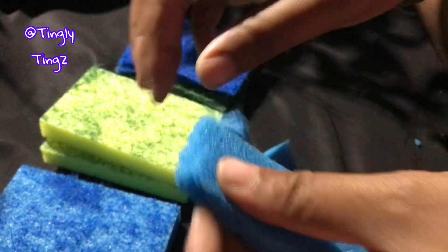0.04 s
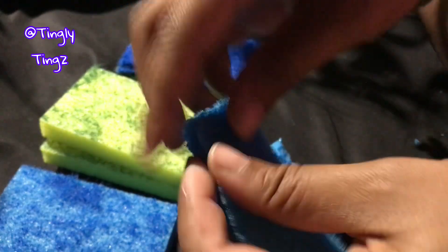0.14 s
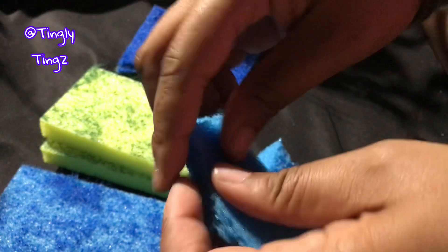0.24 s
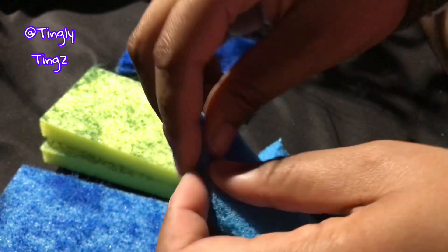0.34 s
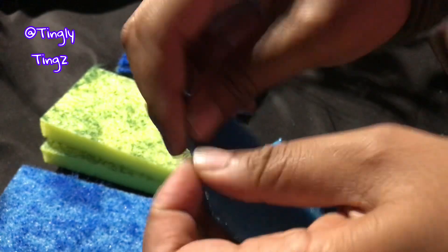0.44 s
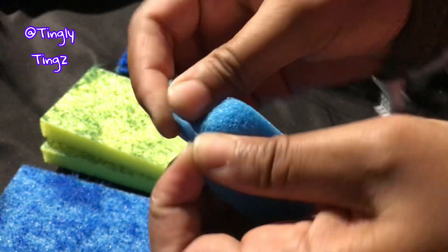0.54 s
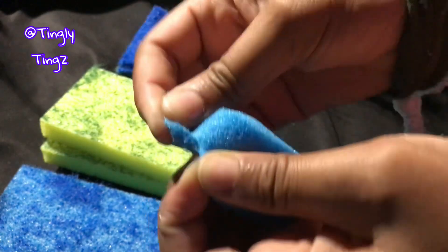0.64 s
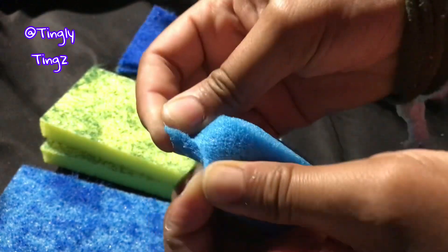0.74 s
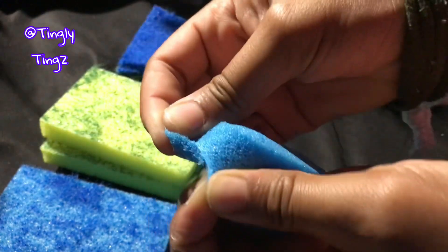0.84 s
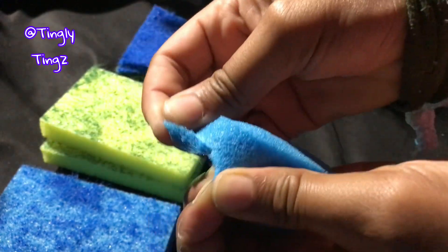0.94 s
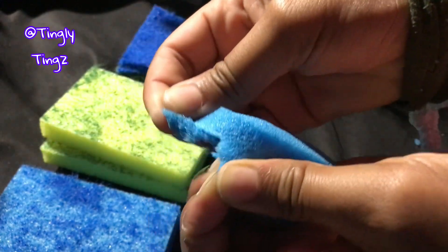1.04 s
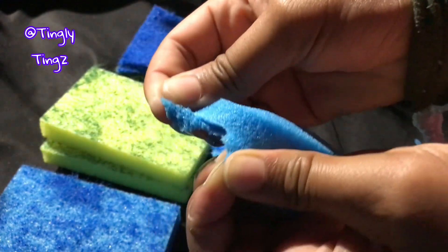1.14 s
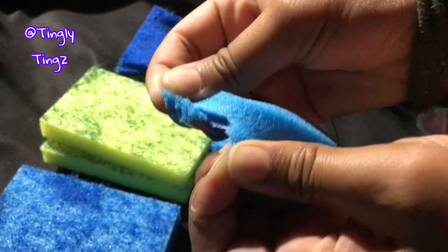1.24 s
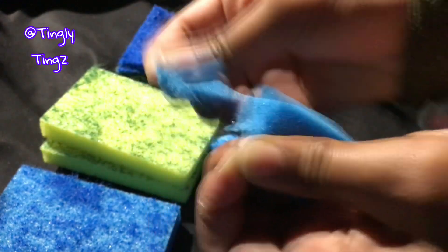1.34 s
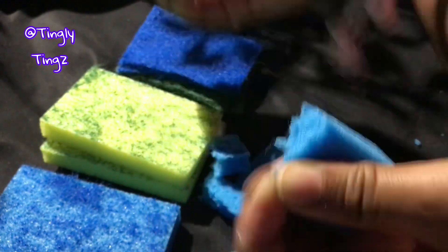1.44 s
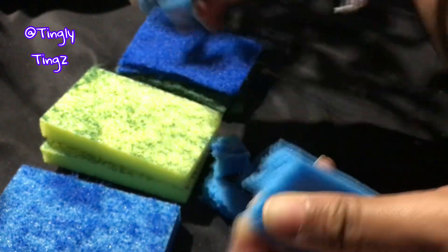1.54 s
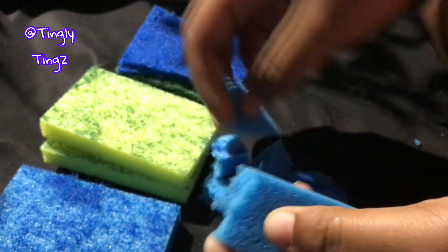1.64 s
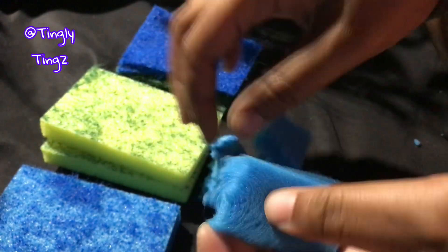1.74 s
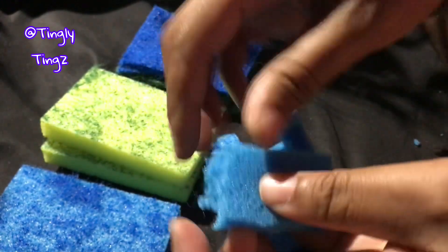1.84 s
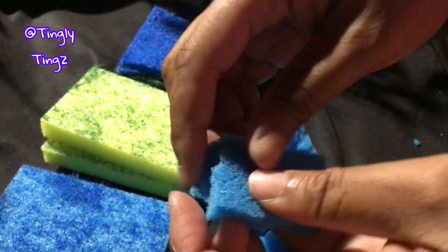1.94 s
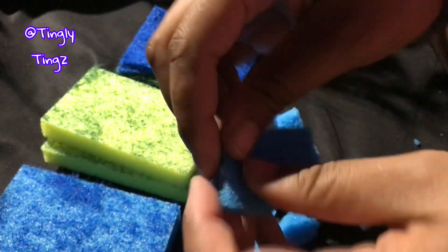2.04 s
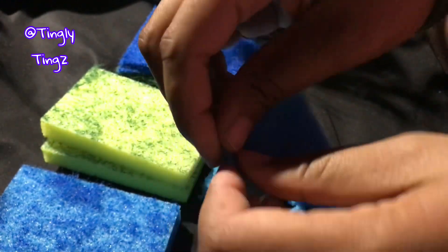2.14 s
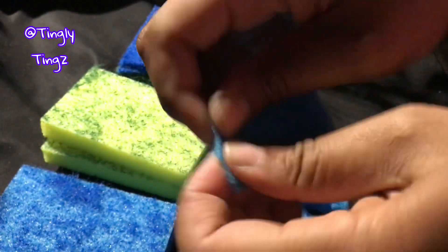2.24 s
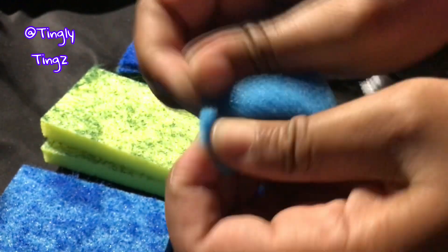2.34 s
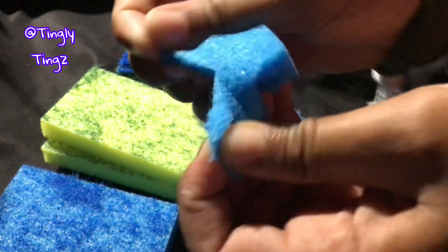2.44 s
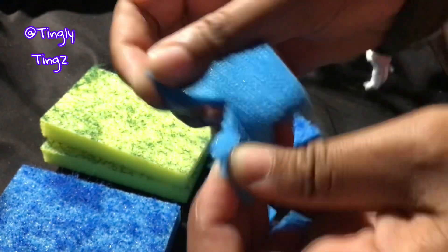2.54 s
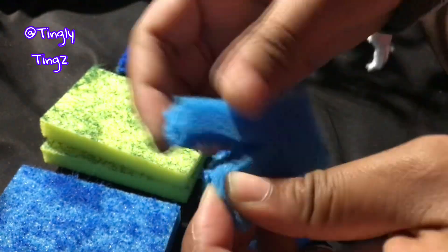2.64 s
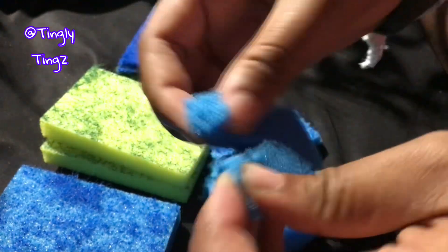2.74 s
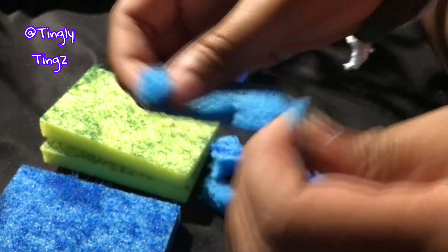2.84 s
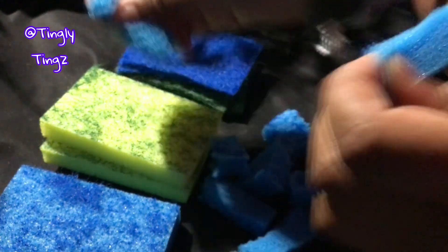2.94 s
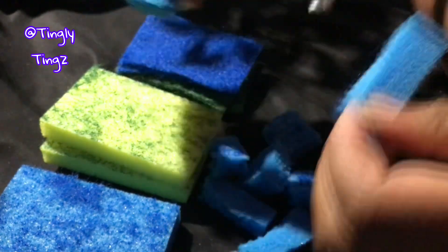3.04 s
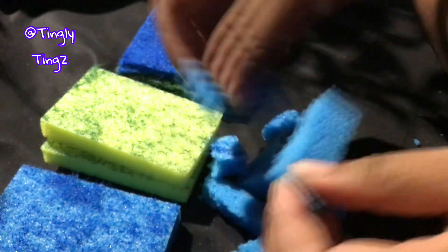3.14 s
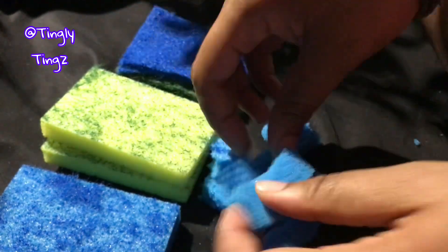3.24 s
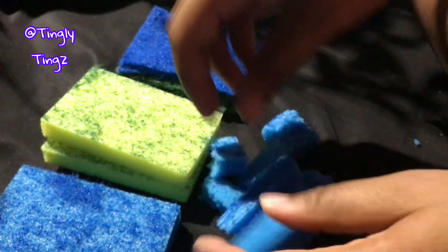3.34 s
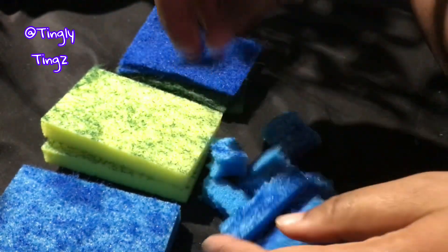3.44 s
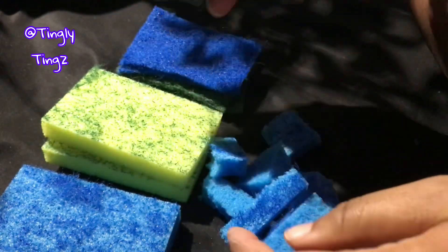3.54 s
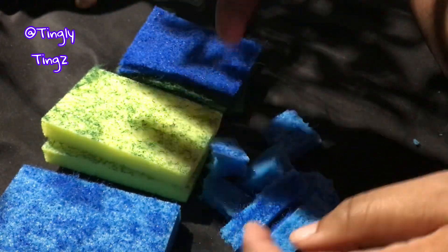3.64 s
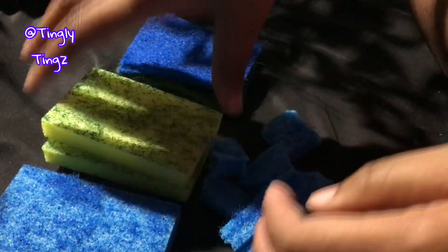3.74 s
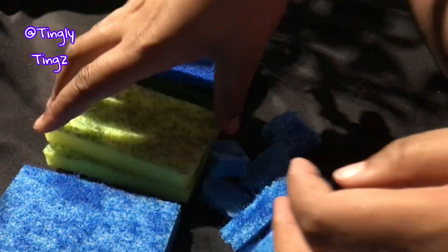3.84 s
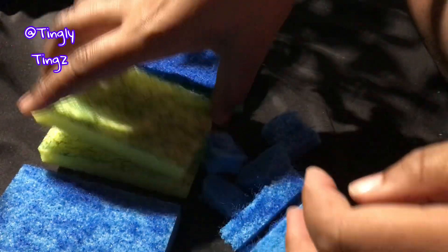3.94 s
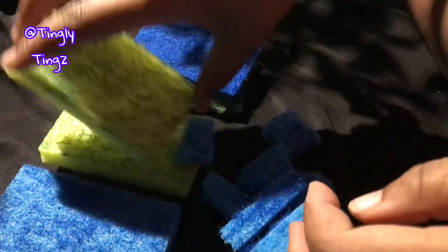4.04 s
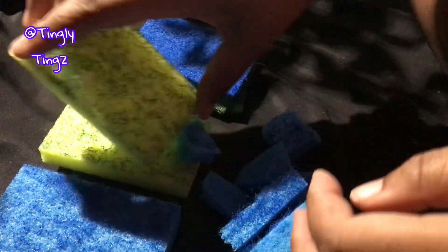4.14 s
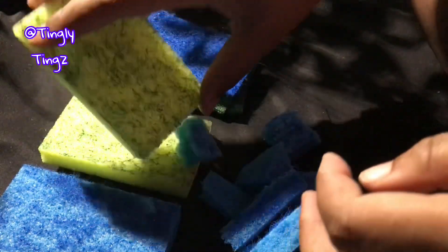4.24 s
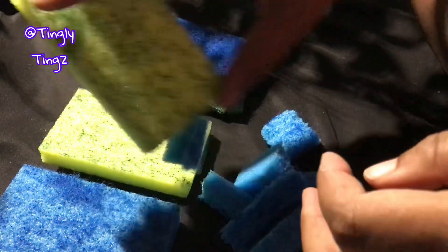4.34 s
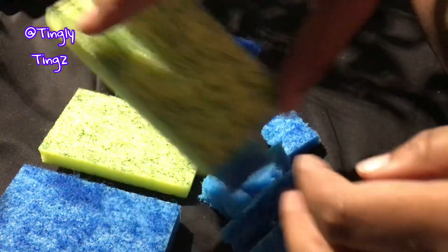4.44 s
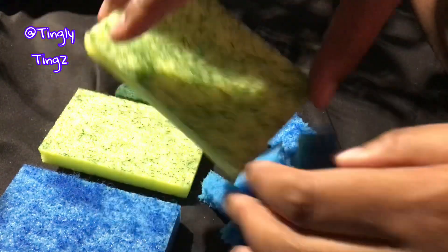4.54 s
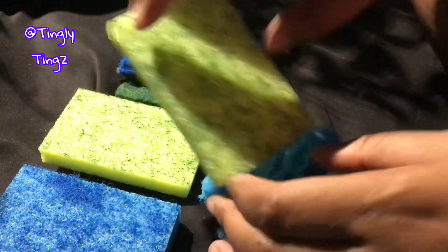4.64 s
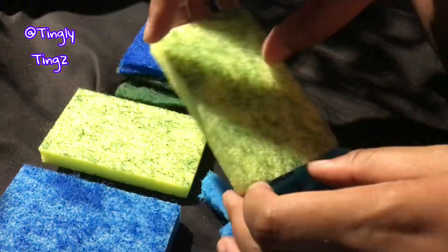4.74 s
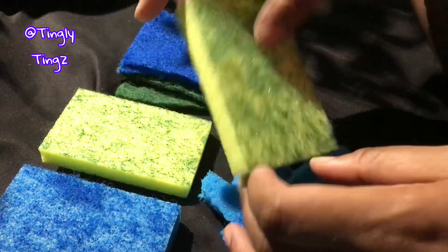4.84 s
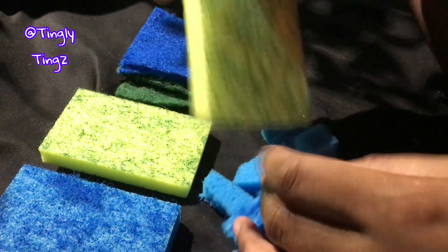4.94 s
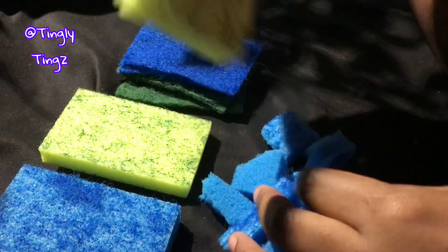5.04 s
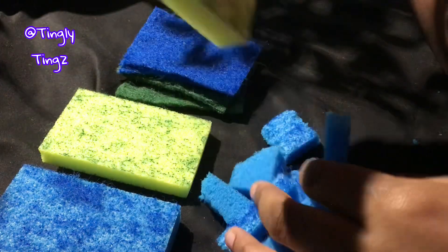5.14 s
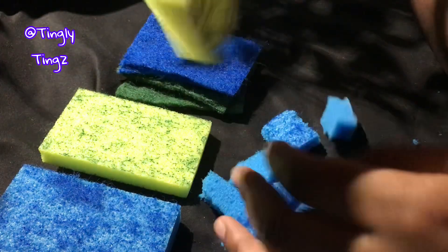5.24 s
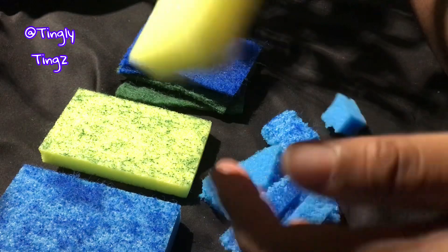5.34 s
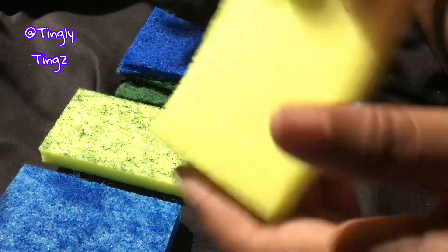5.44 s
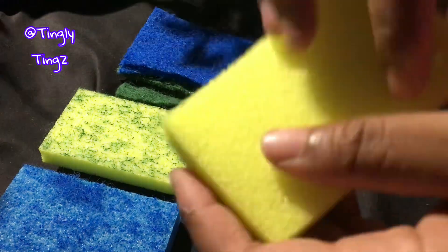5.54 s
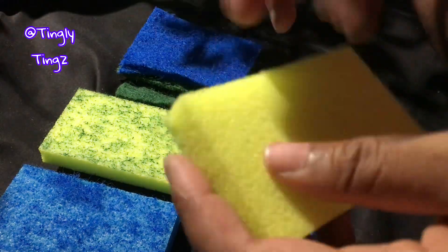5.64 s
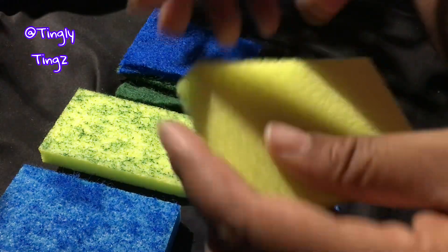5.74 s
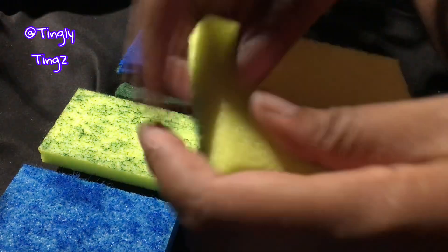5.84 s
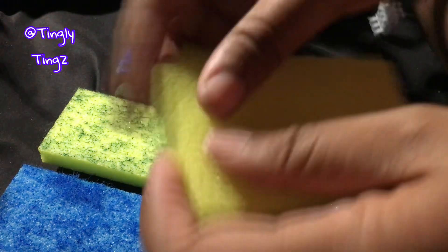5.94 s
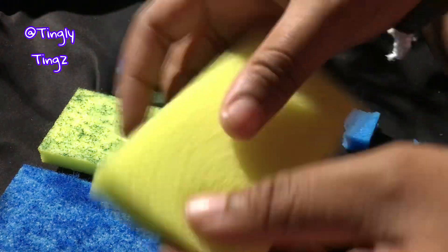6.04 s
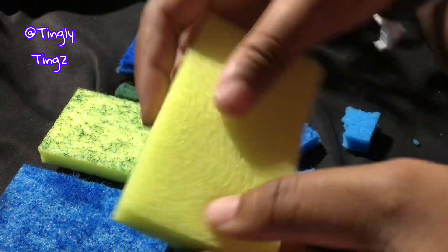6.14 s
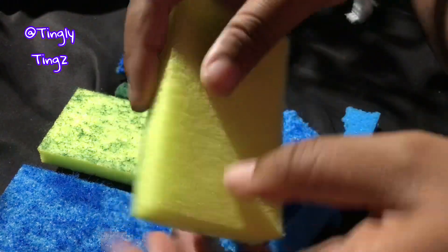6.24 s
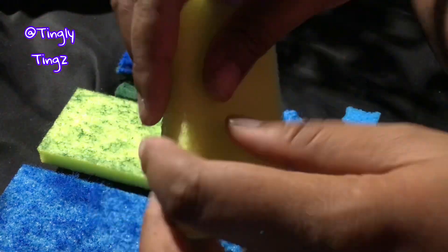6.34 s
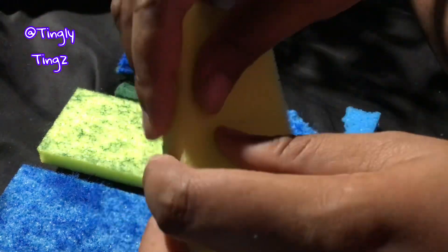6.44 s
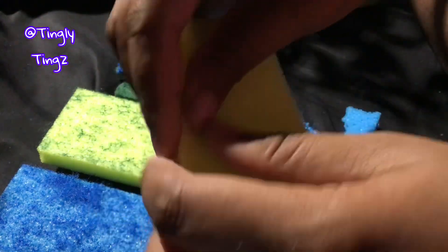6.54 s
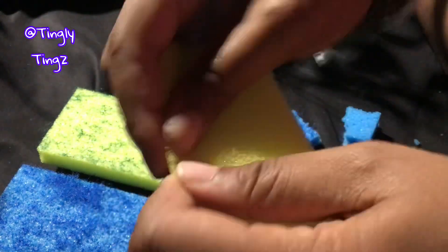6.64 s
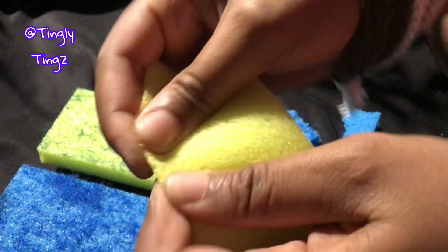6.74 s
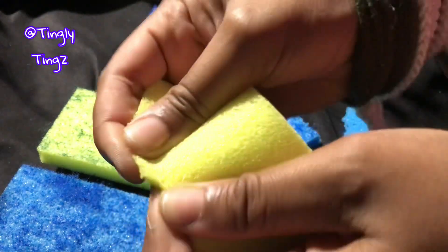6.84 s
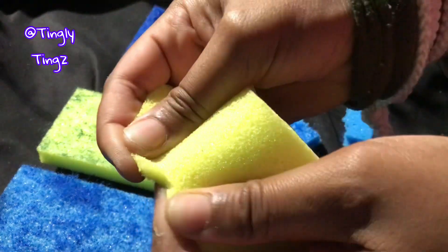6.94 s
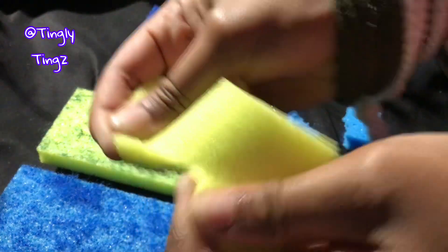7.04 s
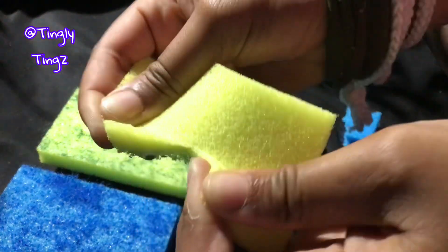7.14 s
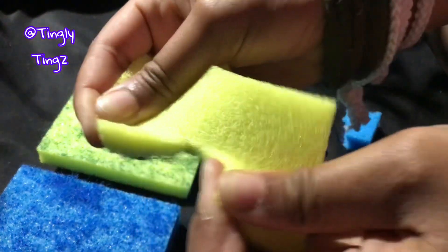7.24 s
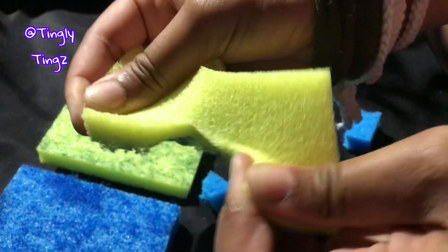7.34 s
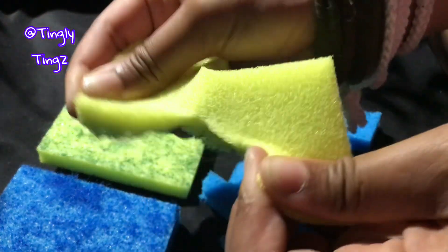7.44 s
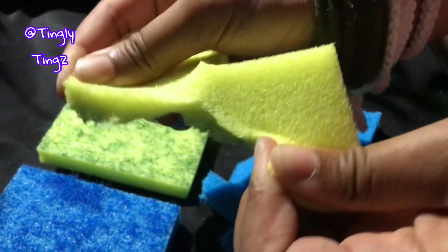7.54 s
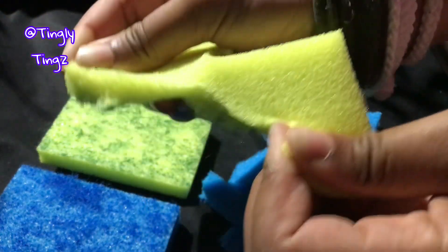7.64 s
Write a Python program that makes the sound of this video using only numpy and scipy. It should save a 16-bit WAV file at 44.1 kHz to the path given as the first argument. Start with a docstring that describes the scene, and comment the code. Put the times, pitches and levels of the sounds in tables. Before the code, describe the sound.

Hands work on kitchen sponges close by in a quiet room, over a faint motor drone, a thin appliance whine and soft hiss. From about 0.5 seconds, stretched foam fizzes and crackles, with sharp little snaps from 0.85. At 1.4 a piece rips off with a dry pop. After light rubbing, more snaps and a quick rip come at 2.4, then a third rip at 2.9 with a smaller pop and a very soft bump of a hand on cloth. From 3 to about 6.7 seconds there is only faint, scattered rustling and ticking of fingers on foam, a little busier after 5.5. From 6.8 a second, coarser sponge tears in several pulls, a denser, bright crackle with snapping strands, strongest between 7 and 7.5 and continuing to the end near 7.7. The low drone swells slightly under it.

```python
"""In a quiet room, hands pull two kitchen sponges apart close by: a blue one, then a coarser yellow one.
Stretched foam fizzes as its thin cell walls break, and its thicker strands (struts) crackle and snap.
Three times a piece rips right off; twice the freed foam springs back with a pop.
Between tears the fingers rub the sponges, and once a hand lands softly on the cloth.
Behind it all, motors drone and appliances hum and whine over the rumble and hiss of the room."""
import sys
import numpy as np
from scipy import signal
from scipy.fft import rfft, irfft
from scipy.io import wavfile
from scipy.ndimage import uniform_filter1d

SR = 44100
rng = np.random.default_rng(int(sys.argv[2]) if len(sys.argv) > 2 else 0)


def bounce(signal):
    """Save signal as a 16-bit WAV file at the path given by the first command-line argument."""
    frames = np.transpose(np.atleast_2d(signal))
    limited = np.clip(frames, -1, 1)
    pcm = np.round(limited * 32767).astype(np.int16)
    wavfile.write(sys.argv[1], SR, pcm)


N = 339129
TIME = np.arange(N) / SR

# Levels in the tables are relative: the functions may turn a whole layer up or down.
# tone colours of the room's rumble and hiss: (pitch [Hz], level [dB])
RUMBLE_SPECTRUM = [(20, -24.5), (50, -15.5), (85, -1), (115, -6), (150, -5.5), (178, 2), (230, -4.5),
                   (295, -14), (340, -9), (460, -20.5), (700, -16), (900, -16), (1100, -15.5), (1400, -26)]
HISS_SPECTRUM = [(1000, -5.5), (1400, 3.5), (2000, 2.5), (2500, 3.5), (2750, -6), (3200, -1), (3800, -8.5),
                 (4900, -13), (5500, -11.5), (7500, -17), (9300, -14.5), (10300, -25), (11500, -17),
                 (16000, -18)]
# moments when two motors are out of step and their drone sinks: (time [s])
MOTOR_LULL_TIMES = [0.3, 0.26, 2.3, 3, 4.5, 6.5, 8.5]
# a third motor that swells late: (time [s], level [dB])
LATE_MOTOR_LEVELS = [(0, -75), (5.9, -57), (6.25, -47), (6.55, -49), (7.3, -39), (7.69, -43.5)]
# steady hum of a fan and the mains: (pitch [Hz], level [dB])
HUM_TONES = [(58.7, -94), (93.9, -42.5), (120, -60.5), (187.7, -47), (240, -49.5), (258.2, -55),
             (281.6, -67), (360, -65), (518, -68.5), (775, -78), (1749, -69.5), (1987, -71.5),
             (2401.7, -68)]
# narrow bands where the appliances whine and whistle: (pitch [Hz], width [Hz], level [dB])
WHINE_BANDS = [(2236, 7.1, -14.5), (2236, 26, -12.5), (2297, 33, -6), (2325, 8.7, -16), (2318.5, 2.9, -3.5)]
WHISTLE_BANDS = [(3166, 166, -69), (5350, 81, -88), (9660, 440, -81.5), (12000, 190, -83)]
# swells of the whine and of the lowest whistle: (middle [s], half length [s], rise [dB])
WHINE_RISES = [(0.123, 0.13, 4.5), (0.855, 0.28, 8), (1.478, 0.22, 2), (2.117, 0.24, 7.5),
               (3.31, 0.07, 8.5), (5.85, 0.5, 3.5), (7.1, 0.87, 6)]
LOW_WHISTLE_RISES = [(6.1, 1.65, 9)]
# fingers stroke the foam: (middle [s], half length [s], level [dB])
FINGER_STROKES = [(0.15, 0.045, -60), (0.28, 0.067, -64), (1.468, 0.11, -63), (1.616, 0.027, -60),
                  (2.013, 0.018, -56), (2.29, 0.033, -57.5), (2.492, 0.081, -61), (2.667, 0.038, -59),
                  (3.3, 0.02, -65), (3.618, 0.028, -52.5), (3.923, 0.066, -65), (4.855, 0.078, -64.5),
                  (5.06, 0.077, -64), (5.48, 0.02, -63), (5.612, 0.12, -60.5), (5.785, 0.12, -60.5),
                  (5.97, 0.026, -48.5), (6.052, 0.072, -54), (6.162, 0.023, -53), (6.376, 0.064, -65),
                  (6.519, 0.022, -50), (6.706, 0.22, -63.5)]
# fingertips catch on the foam: (time [s], level [dB])
FINGER_CATCHES = [(2.664, -35), (3.0615, -39.5), (4.5844, -43), (5.473, -34), (5.6214, -41), (6.158, -31),
                  (6.3505, -38), (6.757, -30.5), (6.7915, -41), (6.8907, -22)]
# tone colour of rubbed foam: (pitch [Hz], level [dB])
RUB_SPECTRUM = [(800, 0), (3000, 5), (4500, 1.5), (6000, 0), (7700, -0.5), (9300, 0.5), (10300, -1),
                (11300, 2.5), (13500, 3), (16000, 4.5)]
# pulls that slowly tear each sponge: (start [s], end [s], wall level [dB], strut level [dB])
BLUE_PULLS = [(0.492, 1.22, -53, -65.5), (0.56, 0.6, -47, -54), (0.882, 0.91, -43.5, -57),
              (0.966, 1, -42, -52), (1.02, 1.16, -46.5, -69), (1.055, 1.074, -43.5, -51),
              (1.208, 1.32, -42, -59)]
YELLOW_PULLS = [(6.765, 7.125, -49, -63.5), (6.975, 7.02, -40, -58), (7.02, 7.118, -39, -44),
                (7.185, 7.24, -45, -53), (7.232, 7.36, -36, -40.5), (7.398, 7.485, -36.5, -44),
                (7.49, 7.6, -41.5, -52.5), (7.61, 7.69, -39.5, -51)]
# tone colours of breaking cell walls and struts in each sponge: (pitch [Hz], level [dB])
BLUE_WALL_SPECTRUM = [(1500, -21), (4900, -13.5), (5600, -6), (6700, -4), (7700, -7.5), (9400, -1),
                      (10400, -7.5), (11100, -1), (12500, 0), (14000, 3.5), (16000, 1)]
BLUE_STRUT_SPECTRUM = [(150, -5), (350, -7), (600, 9.5), (1200, 2.5), (2000, 2), (3200, -0.5), (4200, -0.5),
                       (5000, -5), (6700, -3.5), (8000, -19), (16000, -14)]
YELLOW_WALL_SPECTRUM = [(1500, -28), (5000, -20), (6500, -12), (7500, -7.5), (9300, -5.5), (10200, -6.5),
                        (11400, -0.5), (13400, -0.5), (14200, 2.5), (16000, -0.5)]
YELLOW_STRUT_SPECTRUM = [(150, -11), (550, -3), (1000, -0.5), (1600, -1.5), (2600, -8), (3400, 0.5),
                         (3700, -4.5), (4300, 2.5), (5000, -4.5), (5550, -1), (6100, -3.5), (8000, -6.5),
                         (16000, -9)]
# single strands snap: (time [s], bright level [dB], strut level [dB])
STRAND_SNAPS = [(0.4975, -40, -48), (0.853, -26, -54), (0.8607, -16.5, -32), (0.8856, -17.5, -33.5),
                (0.971, -26, -37), (1.065, -21, -46), (1.1448, -20, -48), (1.2303, -21, -38),
                (1.2535, -18, -38), (1.3378, -19, -44), (2.3096, -28, -55), (2.325, -31, -47),
                (2.346, -26, -50), (2.3615, -20, -47), (2.385, -26, -34), (2.4025, -19, -40),
                (2.4224, -18, -34), (2.8437, -18, -36), (2.8549, -13, -29.5), (2.8803, -19, -30),
                (6.971, -23.5, -40), (7.0758, -18, -47), (7.1066, -27, -39), (7.1216, -19, -43),
                (7.2434, -20, -25), (7.3015, -17, -32), (7.439, -23, -35)]
# fast rips, two rows for each piece:
# (start [s], end [s], swell [s], fade [s], wall level [dB], strut level [dB], pitch of the strip [Hz])
FAST_RIPS = [(1.344, 1.356, 0.0006, 0.0033, -27.5, -36, 2780),
             (1.365, 1.376, 0.004, 0.0011, -36, -31, 7050), (2.377, 2.401, 0.0058, 0.012, -36, -33.5, 3430),
             (2.414, 2.442, 0.026, 0.0096, -32, -38.5, 5900),
             (2.853, 2.869, 0.0013, 0.0063, -36, -41.5, 6400),
             (2.891, 2.917, 0.018, 0.0025, -28.5, -36, 6500)]
# tone colour of the blue foam's struts in a fast rip: (pitch [Hz], level [dB])
RIP_STRUT_SPECTRUM = [(150, -23), (400, -9.5), (600, 4.5), (1000, -3), (1400, 1.5), (1850, 2.5), (2500, -1),
                      (3300, 0.5), (4200, -0.5), (5200, -6.5), (6700, -1.5), (8000, -6), (16000, -6)]
# freed foam springs back: (time [s], level [dB])
FOAM_RECOILS = [(1.3749, -15), (2.9152, -25)]


def from_db(db):
    """Turn decibels into a number to multiply a sound by."""
    return 10 ** (np.asarray(db) / 20)


def rms_one(x):
    """Scale a signal so its average strength (rms) is 1."""
    return x / np.sqrt(np.mean(x ** 2) + 1e-20)


def colour(x, spectrum, size=16384):
    """Give a sound a tone colour; white noise keeps its power."""
    hz, db = np.transpose(spectrum)
    log_hz = np.log(np.arange(size // 2 + 1) * SR / size + 1)
    gain = rms_one(from_db(np.interp(log_hz, np.log(hz), db)))
    cepstrum = irfft(np.log(gain), size)
    cepstrum[1:size // 2] *= 2      # this line and the next put all ringing after its cause
    cepstrum[size // 2 + 1:] = 0
    ringing = irfft(np.exp(rfft(cepstrum)), size)[:size // 2]
    return signal.oaconvolve(x, ringing)[:N]


def drift(per_s):
    """A smooth random wander of size about 1, changing roughly per_s times a second."""
    steps = rng.standard_normal(int(TIME[-1] * 1000) + 2000)  # one each millisecond, plus a run-up
    memory = np.exp(-2 * np.pi * per_s / 1000)
    slow = signal.lfilter([1], [1, -2 * memory, memory * memory], steps)[1990:]
    return np.interp(TIME * 1000, np.arange(len(slow)), rms_one(slow))


def tone(hz):
    """A pure tone of average strength 1."""
    return np.sqrt(2) * np.sin(2 * np.pi * (hz * TIME + rng.random()))


def swell(middle_s, half_s):
    """A smooth rise and fall of height 1."""
    return np.exp(-np.minimum(((TIME - middle_s) / half_s) ** 2, 60))


def swelling(steady_db, rises):
    """The strength of a steady sound that grows louder now and then."""
    return from_db(steady_db + sum(db * swell(middle, half) for middle, half, db in rises))


def clicks(rows, column=1):
    """One spike for each row, as high as the level in the chosen column."""
    rows, spikes = np.array(rows), np.zeros(N)
    spikes[np.round(rows[:, 0] * SR).astype(int)] = from_db(rows[:, column])
    return spikes


def bursts(spikes, decay_s):
    """Each spike sets off a tiny rush of breaks: a puff of noise that dies away."""
    fading = signal.lfilter([1], [1, -np.exp(-1 / (decay_s * SR))], spikes + 1e-18)
    return fading * rng.standard_normal(N)


def crackle(per_s, spread_db, decay_s, clump_db):
    """Random breaks of uneven size come in clumps; their average strength is held near 1."""
    breaks = rng.random(N) < per_s / SR
    sizes = from_db(spread_db * np.minimum(rng.exponential(1, N), 4) + clump_db * drift(71))
    x = bursts(breaks * sizes, decay_s)
    return x / np.sqrt(uniform_filter1d(x ** 2, size=900) + 1e-4)


def air(rumble_db, hiss_db):
    """The room rumbles and hisses steadily."""
    low, high = rng.standard_normal((2, N))
    low = signal.sosfilt(signal.butter(4, 1500, fs=SR, output="sos"), low)
    rumble = from_db(rumble_db) * colour(low, RUMBLE_SPECTRUM)
    return rumble + from_db(hiss_db) * colour(high, HISS_SPECTRUM)


def motors(pair_hz, late_hz, pair_db, beat_depth):
    """Two motors at almost the same speed slip in and out of step (they beat); a third swells late."""
    slip = 2 * np.pi * np.interp(TIME, MOTOR_LULL_TIMES, np.arange(len(MOTOR_LULL_TIMES)))
    together = np.abs(1 - beat_depth * np.exp(1j * slip))
    late_gain = from_db(np.interp(TIME, *np.transpose(LATE_MOTOR_LEVELS)))
    return from_db(pair_db) * together * tone(pair_hz) + late_gain * tone(late_hz)


def narrow_noise(bands):
    """Swirling air keeps a few sharp pitches ringing."""
    total = 0
    for hz, width_hz, db in bands:
        phase = 2 * np.pi * hz * TIME
        ring = drift(width_hz / 2) * np.cos(phase) + drift(width_hz / 2) * np.sin(phase)
        total += from_db(db) * ring
    return total


def appliances(whine_db, low_whistle_db, waver_db):
    """A fan and the mains hum, under faint whistles and a whine whose close pitches beat together."""
    hum = sum(from_db(db + waver_db * drift(3.5)) * tone(hz) for hz, db in HUM_TONES)
    whine = narrow_noise(WHINE_BANDS)
    whine /= np.sqrt(uniform_filter1d(whine ** 2, size=12000))  # even out slow changes in level
    whistles = narrow_noise(WHISTLE_BANDS)
    low_whistle = swelling(low_whistle_db, LOW_WHISTLE_RISES) * narrow_noise([(1091, 95, 0)])
    return hum + swelling(whine_db, WHINE_RISES) * whine + whistles + low_whistle


def fingers(rub_db, catch_db, uneven_db):
    """Skin slides over open cells in a fine, uneven rustle, and catches now and then."""
    grip_power = from_db(-77.5) ** 2  # a faint rustle stays between strokes
    stroke_power = sum((from_db(db) * swell(middle, half)) ** 2 for middle, half, db in FINGER_STROKES)
    strength = np.sqrt(grip_power + stroke_power) * from_db(uneven_db * drift(15))
    slide = strength * crackle(per_s=3500, spread_db=1.1, decay_s=0.0017, clump_db=1.7)
    catches = bursts(clicks(FINGER_CATCHES), decay_s=0.0011)
    return colour(from_db(rub_db) * slide + from_db(catch_db) * catches, RUB_SPECTRUM)


def between_hands(x, echo_db, sway):
    """Echoes off the moving palms and the table keep shifting the tone colour."""
    total, samples = x, np.arange(N)
    for delay_s in (0.0004, 0.0009, 0.0014):
        lag = SR * delay_s * np.exp(sway * drift(0.8))
        total = total + from_db(echo_db) * np.interp(samples - lag, samples, x)
    return total


def room_echo(x, echo_db, fade_s):
    """The furnished room adds a short, faint tail that falls 60 dB in fade_s."""
    t = TIME[:SR // 3]
    tail = rng.standard_normal(len(t)) * from_db(-60 * t / fade_s) * (t > 0.003)
    return x + from_db(echo_db) * signal.oaconvolve(x, tail / np.linalg.norm(tail))[:N]


def pull(start, end, attack_s=0.013, sag_db_per_s=9, release_s=0.027):
    """A pull takes hold quickly, eases as the foam gives, and dies away when the hands stop."""
    since = np.maximum(TIME - start, 0)
    release = np.exp(-np.clip((TIME - end) / release_s, 0, 40))
    return np.minimum(since / attack_s, 1) * from_db(-sag_db_per_s * since) * release


def slow_tear(pulls, wall_spectrum, strut_spectrum, wall_db, strut_db, per_s, spread_db, clump_db=0.5):
    """The tear creeps cell by cell: thin walls fizz brightly, the fewer, thicker struts sound lower."""
    shapes = np.array([pull(start, end) for start, end, _, _ in pulls])
    gains = from_db(np.array(pulls)[:, 2:].T)
    wall_gain, strut_gain = np.sqrt(gains ** 2 @ shapes ** 2)  # overlapping pulls add their power
    walls = from_db(wall_db) * wall_gain * crackle(per_s, spread_db, 0.00096, clump_db)
    struts = from_db(strut_db) * strut_gain * crackle(per_s * 0.5, spread_db, 0.00077, clump_db)
    return colour(walls, wall_spectrum) + colour(struts, strut_spectrum)


def snaps(bright_db):
    """Single strands crack, the thick ones with more body."""
    bright = colour(bursts(clicks(STRAND_SNAPS), decay_s=0.0013), BLUE_WALL_SPECTRUM)
    body = colour(bursts(clicks(STRAND_SNAPS, column=2), decay_s=0.0019), BLUE_STRUT_SPECTRUM)
    return from_db(bright_db) * bright + body


def rips(per_s, spread_db, clump_db, ring_db, ring_sharpness):
    """The last bit of foam gives way: a rush of breaks rings in the tight strip until it is free."""
    fine = crackle(per_s, spread_db, 0.00023, clump_db)
    coarse = crackle(per_s * 0.4, spread_db, 0.00049, clump_db)
    walls, struts = 0, 0
    for start, end, swell_s, fade_s, wall_db, strut_db, strip_hz in FAST_RIPS:
        rise, fall = (TIME - start) / swell_s, (end - TIME) / fade_s
        speed = np.exp(np.clip(np.minimum(rise, fall), -40, 0))  # full from start to end
        ring = signal.lfilter(*signal.iirpeak(strip_hz, ring_sharpness, fs=SR), coarse)
        walls += from_db(wall_db) * speed * fine
        struts += from_db(strut_db) * speed * (coarse + from_db(ring_db) * ring)
    return colour(walls, BLUE_WALL_SPECTRUM) + colour(struts, RIP_STRUT_SPECTRUM)


def recoils(tight_hz, slack_hz, relax_s, decay_s, crack_db):
    """Freed foam springs back: a dry crack and a pop whose pitch falls as the foam goes slack."""
    t = TIME[:SR // 20]
    hz = slack_hz + (tight_hz - slack_hz) * np.exp(-t / relax_s)
    pop = np.sin(2 * np.pi * np.cumsum(hz) / SR) * np.exp(-t / decay_s)
    spikes = clicks(FOAM_RECOILS)
    crack = colour(bursts(spikes, decay_s=0.0012), RUB_SPECTRUM)
    return signal.oaconvolve(spikes, pop)[:N] + from_db(crack_db) * crack


def soft_bump(at_s, half_s, hz, db):
    """A hand comes down softly on the cloth."""
    return from_db(db) * swell(at_s, half_s) * tone(hz)


def scene():
    """Sponges in front and appliances behind, in one channel."""
    foam = slow_tear(BLUE_PULLS, BLUE_WALL_SPECTRUM, BLUE_STRUT_SPECTRUM,
                     wall_db=1.5, strut_db=2.5, per_s=1700, spread_db=5.0)
    foam += slow_tear(YELLOW_PULLS, YELLOW_WALL_SPECTRUM, YELLOW_STRUT_SPECTRUM,
                      wall_db=0.5, strut_db=3.0, per_s=4200, spread_db=5.5)
    foam += rips(per_s=5000, spread_db=4.5, clump_db=1.5, ring_db=3.0, ring_sharpness=7.7)
    foam += snaps(bright_db=-7)
    foam += recoils(tight_hz=1895, slack_hz=170, relax_s=0.00118, decay_s=0.0017, crack_db=-1.5)
    foam += fingers(rub_db=2.0, catch_db=-7.5, uneven_db=2.6)
    foam = between_hands(foam, echo_db=-10.5, sway=0.13)
    behind = motors(pair_hz=117, late_hz=126.7, pair_db=-46, beat_depth=0.57)
    behind += appliances(whine_db=-49, low_whistle_db=-66.5, waver_db=0.85)
    behind += air(rumble_db=-43.5, hiss_db=-59)
    front = room_echo(foam, echo_db=-15.5, fade_s=0.12)
    front += soft_bump(at_s=2.94, half_s=0.022, hz=53.5, db=-46)
    return (front + behind)[None]


def record(dry):
    """The highest treble, above 15900 Hz, is cut off steeply."""
    return signal.sosfilt(signal.ellip(12, 0.1, 80, 15900, fs=SR, output="sos"), dry)


dry = scene()
out = record(dry)
bounce(out)
```